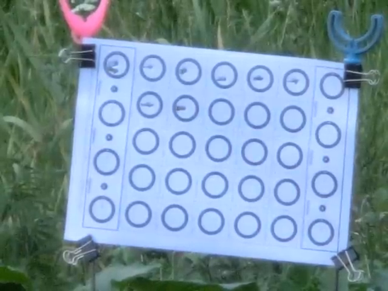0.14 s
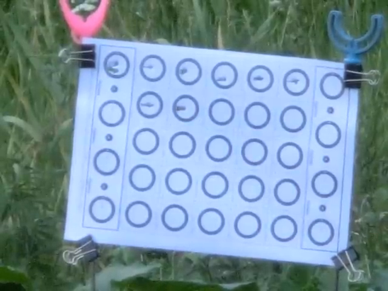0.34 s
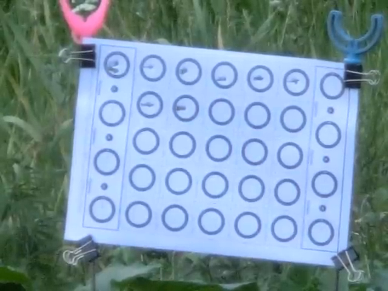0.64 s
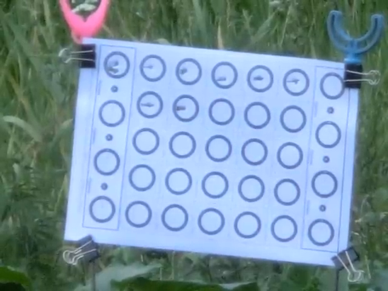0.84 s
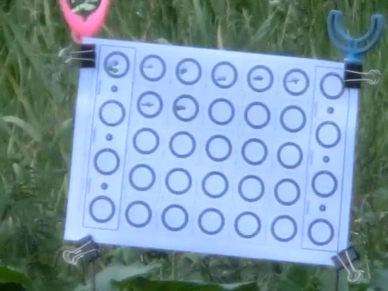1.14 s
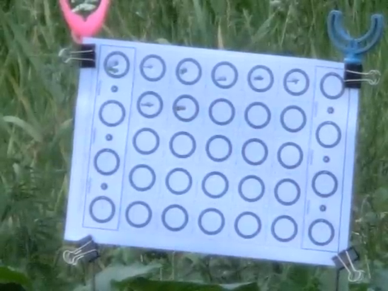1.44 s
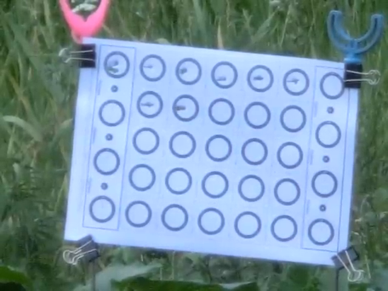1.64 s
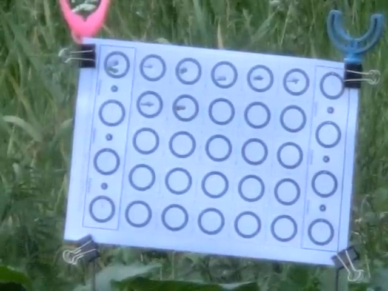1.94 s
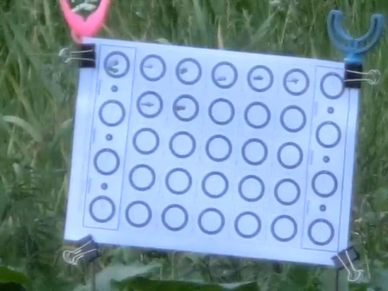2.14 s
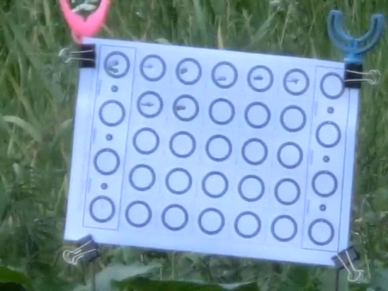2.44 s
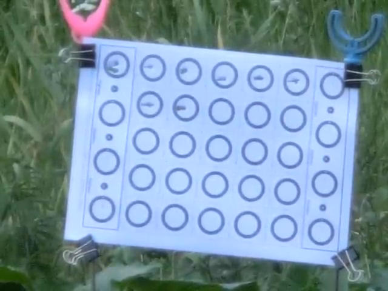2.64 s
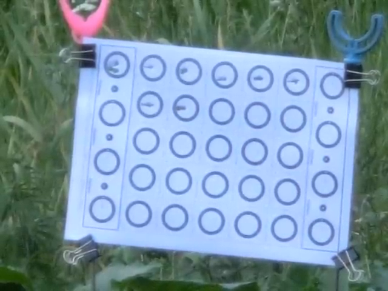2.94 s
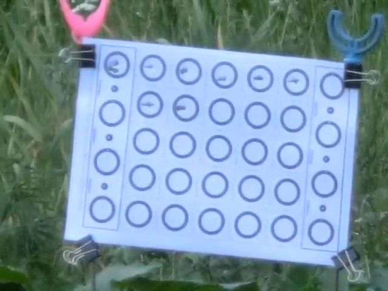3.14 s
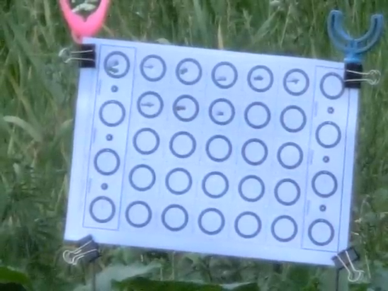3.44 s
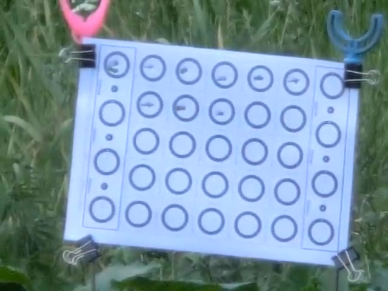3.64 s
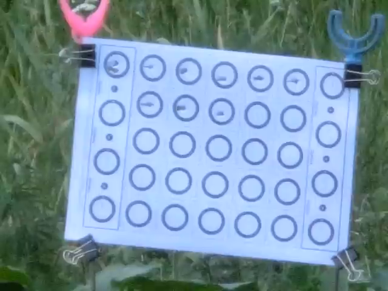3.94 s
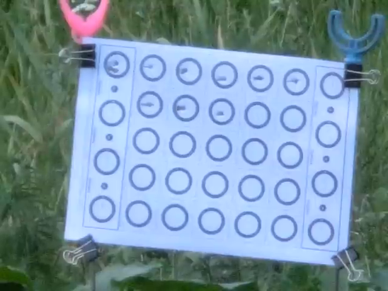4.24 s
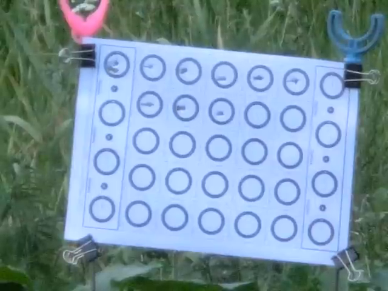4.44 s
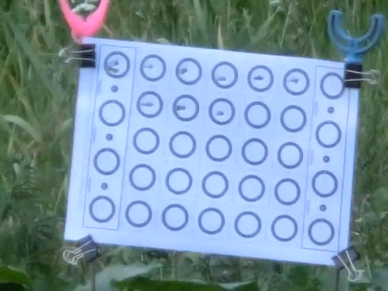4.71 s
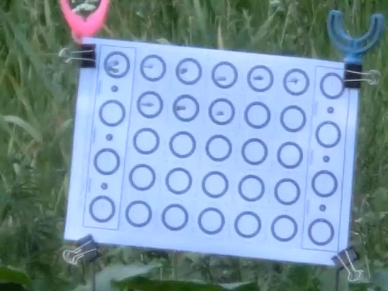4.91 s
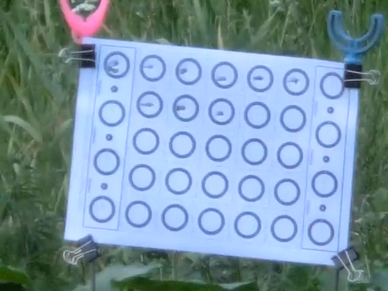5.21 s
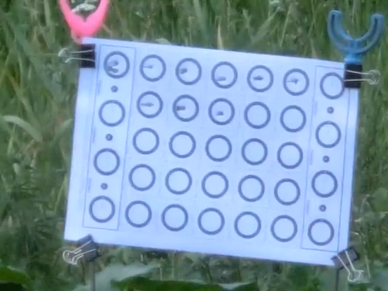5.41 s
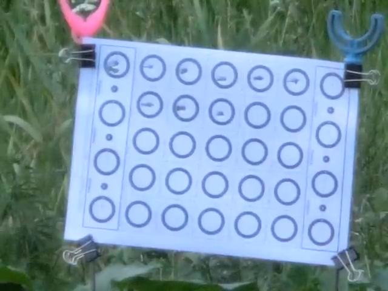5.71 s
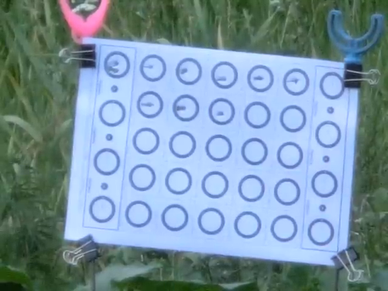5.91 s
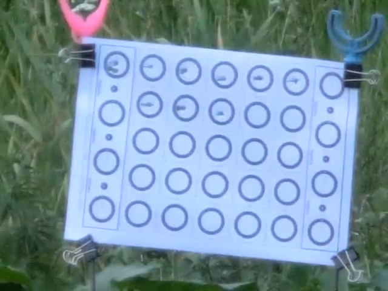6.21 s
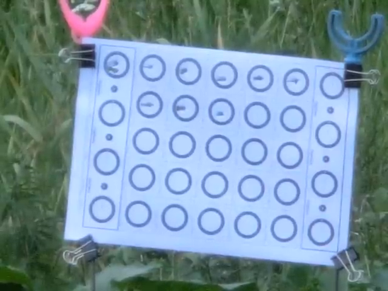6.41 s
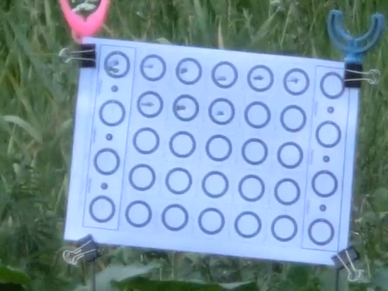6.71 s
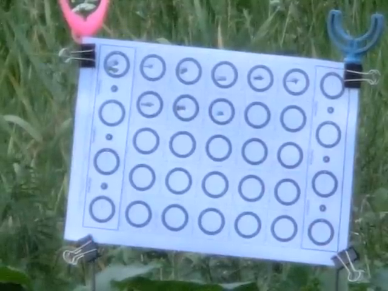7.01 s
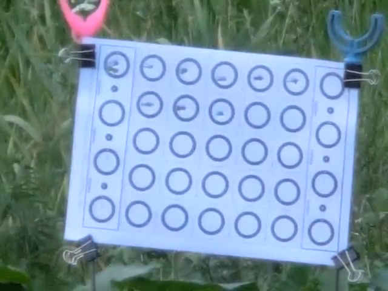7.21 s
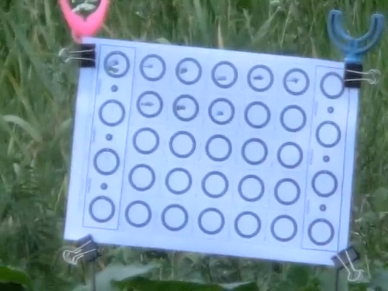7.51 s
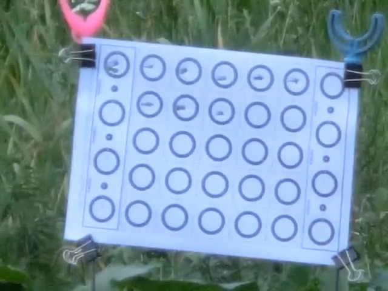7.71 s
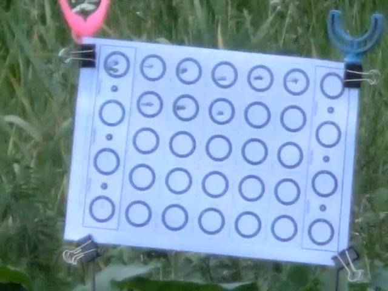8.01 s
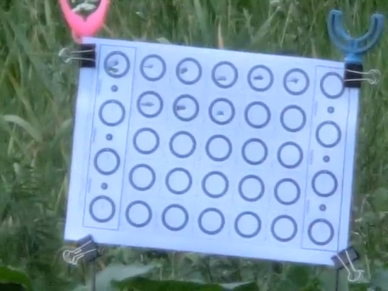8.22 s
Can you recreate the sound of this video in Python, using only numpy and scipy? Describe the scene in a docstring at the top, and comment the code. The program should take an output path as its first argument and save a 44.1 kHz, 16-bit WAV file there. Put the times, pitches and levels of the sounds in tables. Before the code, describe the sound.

A quiet field with passing traffic is split by a single air rifle shot hitting its target; the action clicks and rasps as background swells back.

```python
"""Air rifle shot in a grassy field

One shot cracks, the pellet smacks its target and trees throw the report back; then the action clicks and rasps.
Decaying resonances make the rifle, shaped noise its air jet, echo and clicks, and two short snaps the pellet.
Cars (filtered noise under a sliding comb), an engine drone, a gust, hiss and chirping birds lie behind.
The shot knocks the recorder's gain down, and the background slowly swells back."""
import sys
import numpy as np
from scipy import signal
from scipy.fft import rfft, irfft, next_fast_len
from scipy.io import wavfile
from scipy.ndimage import uniform_filter1d, minimum_filter1d

SR = 44100
rng = np.random.default_rng(int(sys.argv[2]) if len(sys.argv) > 2 else 0)


def materialize(psi):
    """Save the field psi as 16-bit PCM at rate SR to the path in sys.argv[1].

    A 1-D psi becomes a single channel; in a 2-D psi each row is a channel.
    """
    bounded = np.clip(np.atleast_2d(psi).T, -1, 1)
    quanta = np.round(bounded * 32767).astype(np.int16)
    wavfile.write(sys.argv[1], SR, quanta)


N = 368676  # length in samples


def amp(db):
    """Decibels to gain."""
    return 10 ** (np.asarray(db) / 20)


def evened(x):
    """Scales to rms 1."""
    return x / np.sqrt(np.mean(x ** 2) + 1e-30)


def read(points, hz):
    """Reads a curve on a log-frequency axis."""
    f, value = np.transpose(points)
    return np.interp(np.log(hz + 1), np.log(f), value)


def add(mix, s, sound):
    """Mixes a mono or stereo sound in at time s."""
    part = mix[:, round(s * SR):][:, :sound.shape[-1]]
    part += sound[..., :part.shape[1]]


def bump(t, centre, half):
    """A smooth hump of height 1 that falls to 1/e at half a length from its centre."""
    return np.exp(-((t - centre) / half) ** 2)


def swell(t, rise, t60):
    """An envelope that rises from t = 0 and dies away."""
    t = np.maximum(t, 0)
    return (1 - np.exp(-t / rise)) * amp(-60 * t / t60)


def smooth_random(size, width):
    """A smoothed random curve of rms 1."""
    return evened(uniform_filter1d(rng.standard_normal(size), size=width))


def noise(spectrum, likeness, size):
    """Stereo noise of rms 1 with a given colour and left-right likeness."""
    length = next_fast_len(size)
    hz = np.fft.rfftfreq(length, 1 / SR)
    a, b = rfft(rng.standard_normal((2, length)))
    same = np.clip(read(likeness, hz), -1, 1)
    pair = np.array([a, same * a + np.sqrt(1 - same ** 2) * b])
    return evened(irfft(pair * amp(read(spectrum, hz)), length)[:, :size])


# colour of the background haze: freq_hz, density_db (relative, per Hz)
HAZE_COLOUR = [(20, 23), (100, 16.5), (300, 12), (1000, 4.5), (3000, -3), (5000, 4), (6500, 4), (8000, 1),
               (12000, 1), (14500, 0), (15800, -8.5)]
# left-right likeness of the haze and the gust: freq_hz, coherence (0 to 1)
HAZE_LIKENESS = [(100, .1), (3000, .1), (7000, 0.06), (15000, 0.033)]


def hiss(level_db=-81.0):
    """A steady, wide haze of noise, nearly independent left and right."""
    return amp(level_db) * noise(HAZE_COLOUR, HAZE_LIKENESS, N)


# one soft gust at the microphones
GUST_S, GUST_HALF_S, GUST_DB = 4.7, 1, -65  # middle s, half length s, level dB


def gust():
    """A breeze buffets each microphone almost separately, mostly in the lows."""
    t = np.arange(N) / SR
    breeze = noise([(15, 0), (80, -6.0), (250, -21.0), (1500, -49)], HAZE_LIKENESS, N)
    return amp(GUST_DB) * bump(t, GUST_S, GUST_HALF_S) * breeze


# colour of the engine drone: freq_hz, density_db (relative, per Hz)
ENGINE_COLOUR = [(10, -7), (30, -5.5), (50, -6), (72, 1), (105, -5), (150, -12.5), (250, -18), (500, -33.5),
                 (2000, -71)]
# left-right likeness of direct sound: freq_hz, coherence (0 to 1)
DIRECT_LIKENESS = [(20, 0.99), (60, 0.97), (290, 0.93), (800, 0.99), (1500, 0.95), (3100, 0.65), (7000, .6),
                   (15000, .2)]
# the drone swells around the loudest car
DRONE_S, DRONE_HALF_S, DRONE_RISE_DB = 2, 1.2, 2.8  # middle s, half length s, rise dB


def engines(drone_db=-69.7):
    """Low drone of engines: deep noise with one broad swell."""
    t = np.arange(N) / SR
    level_db = drone_db + DRONE_RISE_DB * bump(t, DRONE_S, DRONE_HALF_S)
    return amp(level_db) * noise(ENGINE_COLOUR, DIRECT_LIKENESS, N)


# colour of the tyre roar: freq_hz, density_db (relative, per Hz)
TYRE_COLOUR = [(40, -19.5), (150, -7.5), (300, -3.5), (430, -12), (620, -3.5), (900, 0.5), (1300, -4.5),
               (1750, -9), (2400, -17), (3200, -22), (4500, -30.5), (8000, -38.5), (15000, -45)]
# cars on the road: nearest_s, level_db (there, relative), half_power_s, echo_share (0 to 1),
# pitch_hz (centre of the tilt), breadth_db (per octave either side of the pitch)
PASSING_CARS = [(.2, -78, .7, .3, 1198, 4), (2.5, -64.5, 1, .42, 1000, 0.75),
                (4.3, -74.5, .4, .35, 1000, -0.5), (5.92, -66, .38, .03, 1080, -4.4),
                (7.9, -69, 1.2, 0.071, 899.8, -4.5)]
# lag of the ground echo behind the direct roar: time_s, lag_ms
ECHO_LAG = [(0, 2.4), (1.6, 2.42), (3.1, 2.21), (5.2, 1.95)]


def road(roar_db=1, patchy_db=.9):
    """Each car's tyre roar grows and fades with distance; its echo off the ground lays a sliding comb on it."""
    hz, t, z = signal.stft(noise(TYRE_COLOUR, DIRECT_LIKENESS, N), SR, nperseg=1024, noverlap=768)
    lag_ms = np.interp(t, *np.transpose(ECHO_LAG))
    echo = np.exp(-2j * np.pi * hz[:, None] * lag_ms / 1000)
    band = np.clip(hz[:, None], 300, 8000)  # the tilt stops outside this range
    power = 0
    for s, db, half, share, pitch, breadth in PASSING_CARS:
        tilt_db = breadth * abs(np.log2(band / pitch))
        combed = amp(db + tilt_db) * (1 + share * echo)
        power = power + abs(combed) ** 2 / (1 + ((t - s) / half) ** 2)
    # smooth random patches in both pitch and time
    patches = uniform_filter1d(rng.standard_normal(z.shape), size=14, axis=0)
    patches = evened(uniform_filter1d(patches, size=14, axis=1))
    z = z * np.sqrt(power) * amp(roar_db + patchy_db * patches)
    return signal.istft(z, SR, nperseg=1024, noverlap=768)[1][:, :N]


# left-right likeness of scattered sound: freq_hz, coherence (0 to 1)
SCATTER_LIKENESS = [(60, 0.33), (1400, 0.97), (3100, .88), (6800, .6), (15000, .15)]


def scatter(x, rise, t60):
    """Grass and bushes return a sound as a short diffuse tail."""
    t = np.arange(SR // 2) / SR
    tail = noise([(1, 0), (SR, 0)], SCATTER_LIKENESS, len(t)) * swell(t, rise, t60)
    return signal.oaconvolve(x, tail / np.linalg.norm(tail[0]), axes=1)[:, :N]


def chirp(s, db, hz, length, fall, buzz, pulsing, pulse_hz=70):
    """One falling note; buzz roughens its pitch and pulsing chops it into syllables."""
    u = np.linspace(-.5, .5, round(length * SR))
    jitter = smooth_random(SR // 4, 36)[:len(u)]
    turns = np.cumsum(hz * (1 - fall * u + buzz * jitter)) / SR
    syllables = evened(1 + pulsing * np.cos(2 * np.pi * pulse_hz * length * u))
    note = np.cos(np.pi * u) * syllables * np.sin(2 * np.pi * turns)
    return s - length * 2 / 3, amp(db) * note * np.sqrt(2)  # s falls two thirds into the note


# bouts of evenly spaced chirps, or single ones: first_s, last_s, level_db (relative), pitch_hz
CHIRP_BOUTS = [(.22, 2.3, -86, 6250), (2.16, 3.06, -89.5, 5960), (3.1, 3.1, -83, 6100),
               (4.42, 5.7, -89, 6650), (5.88, 6.66, -89.5, 6326), (6.75, 7.28, -90, 6340),
               (8.17, 8.5, -85, 5700)]
# short falling whistles of another bird: time_s, level_db (relative), pitch_hz
FALLING_WHISTLES = [(6.87, -88, 3600), (6.93, -85.5, 3140)]
# a second bird's pulsed trills: middle_s, level_db (relative), pitch_hz
PULSED_TRILLS = [(3.09, -88.5, 5050), (6.53, -87.5, 5050)]
CHIRP_EVERY_S, BOUT_SWELL_DB = .26, 5  # rough pace within a bout, and how much louder its middle gets
CHIRP_SPREAD_DB, CHIRP_SPREAD_HZ = 1.2, 120  # most that one chirp strays from its bout's curve


def birds(trill_length=.16, trill_hz=29, direct_db=-6, wet_db=-3):
    """Bouts of buzzy chirps, falling whistles and pulsed trills: gliding sines blurred by scatter."""
    out = np.zeros((2, N))
    for first, last, db, hz in CHIRP_BOUTS:
        for u in np.linspace(0, 1, 1 + round(abs(last - first) / CHIRP_EVERY_S)):
            uneven = rng.uniform(-1, 1, 2)
            start = first + u * (last - first)
            level = db + BOUT_SWELL_DB * np.sin(np.pi * u) + CHIRP_SPREAD_DB * uneven[0]
            pitch = hz + CHIRP_SPREAD_HZ * uneven[1]
            add(out, *chirp(start, level, pitch, length=.075, fall=.05, buzz=.06, pulsing=.8))
    for row in FALLING_WHISTLES:
        add(out, *chirp(*row, length=.036, fall=.06, buzz=.012, pulsing=0))
    t = np.arange(round(trill_length * SR)) / SR
    for s, db, hz in PULSED_TRILLS:
        pulses = np.sin(np.pi * t / trill_length) * np.sin(np.pi * trill_hz * t) ** 4
        glide = 1 + .035 * np.sin(2 * np.pi * trill_hz * t)  # each pulse slides down
        turns = np.cumsum(hz * glide) / SR
        add(out, s - trill_length / 2, amp(db) * pulses * np.sin(2 * np.pi * turns) * np.sqrt(2))
    return amp(direct_db) * out + amp(wet_db) * scatter(out, rise=.002, t60=.12)


# colour of the echo from the trees: freq_hz, density_db (relative, per Hz)
TREE_COLOUR = [(200, -24), (1000, -27), (2800, -4), (4500, -1.5), (6500, 0), (9000, 1), (13000, 5),
               (15500, -0.5)]
# how long that echo lasts: freq_hz, t60_s
TREE_DECAY = [(1000, 1), (3000, 1), (6500, 0.74), (10000, 0.5), (15000, 0.26)]


def trees(start_s=3.36, echo_db=-49, rise=0.019, patchy_db=2):
    """The report comes back from a line of trees as an uneven rush that loses its treble first."""
    out = np.zeros((2, N))
    hz, t, z = signal.stft(noise(TREE_COLOUR, SCATTER_LIKENESS, SR), SR, nperseg=256)
    clumps = smooth_random(len(t), 4)
    fade = swell(t, rise, read(TREE_DECAY, hz)[:, None])
    z = z * fade * amp(echo_db + patchy_db * clumps)
    add(out, start_s, signal.istft(z, SR, nperseg=256)[1])
    return out


# clicks of cocking and loading: start_s, peak_db (before scatter), treble_db (treble share, sets the tilt)
LOADING_CLICKS = [(3.6234, -60, -17), (3.9154, -60, -27), (4.0332, -50, -17), (4.0976, -48, -13),
                  (4.3204, -53, -11), (4.3254, -51, -17), (4.4964, -55, -18), (4.7227, -50, -11),
                  (4.7346, -47, -13), (4.7844, -58, -13), (4.8499, -41, -18)]
# colour of the clicks and the slide: freq_hz, density_db (relative, per Hz)
LATCH_COLOUR = [(300, -32), (1200, -16), (2400, 1.5), (3300, -3), (4300, 0), (5200, -1), (6300, -1),
                (8500, -8.5), (12000, -5.5), (15500, -18.5)]


def loading(t60=.013, dry_db=0, wet_db=-8, brighten=0.46, wet_low_hz=4000):
    """Small metal parts scrape and snap home; the grass scatters mostly their treble."""
    t, out = np.arange(SR // 20) / SR, np.zeros((2, N))
    usual = np.mean([row[2] for row in LOADING_CLICKS])
    for s, db, treble in LOADING_CLICKS:
        tilt = brighten * (treble - usual)  # dB per octave around 5 kHz
        colour = [(hz, level + tilt * np.log2(hz / 5000)) for hz, level in LATCH_COLOUR]
        click = noise(colour, DIRECT_LIKENESS, len(t)) * swell(t, 0.0023, t60)
        add(out, s, amp(db) * click / abs(click).max())
    highpass = signal.butter(1, wet_low_hz, "high", fs=SR, output="sos")
    bright = signal.sosfilt(highpass, out)
    return amp(dry_db) * out + amp(wet_db) * scatter(bright, rise=.012, t60=0.16)


# the bolt slides back, then forward: middle_s, half_length_s, level_db
BOLT_SLIDES = [(4.3, .035, -80), (4.715, .03, -80)]


def sliding(catches_per_s=260):
    """The bolt rasps as it slides: a run of tiny catches of random strength."""
    t = np.arange(N) / SR
    catches = (rng.random(N) < catches_per_s / SR) * rng.exponential(1, N)
    tick = noise(LATCH_COLOUR, DIRECT_LIKENESS, SR // 100) * swell(t[:SR // 100], .0003, .005)
    rasp = evened(signal.oaconvolve(catches[None], tick, axes=1)[:, :N])
    return rasp * sum(amp(db) * bump(t, s, half) for s, half, db in BOLT_SLIDES)


# the pellet strikes target and backstop: start_s, peak_db (before scatter), snap_hz
PELLET_STRIKES = [(3.3229, -17, 7500), (3.3243, -25.5, 2400)]


def pellet(cycles=0.44, wet_db=-6):
    """Two very short snaps at the target, scattered by the plants around it."""
    t, out = np.arange(SR // 100) / SR, np.zeros((2, N))
    for s, db, hz in PELLET_STRIKES:
        ring = np.exp(-hz * t / cycles) * np.sin(2 * np.pi * hz * t)
        snap = np.diff(ring, prepend=0)
        add(out, s, amp(db) * snap / abs(snap).max())
    return out + amp(wet_db) * scatter(out, rise=0.00073, t60=0.17)


MUZZLE_S = 3.1641  # the air bursts from the muzzle
# colour of the air jet and its scatter off the ground nearby: freq_hz, density_db (relative, per Hz)
JET_COLOUR = [(40, -17.5), (150, -12), (400, -18), (1200, -14), (1900, -14.5), (2700, -6), (3600, -5),
              (5000, -4), (6100, 2), (7500, -1), (10000, -2.5), (12700, .5), (15500, -7)]
# left-right likeness of the air jet: freq_hz, coherence (0 to 1)
JET_LIKENESS = [(60, 0.51), (1400, 1), (2400, 0.96), (4500, 1), (7000, 1), (12000, 0.35)]


def muzzle(push_db=-14.5, push_hz=125, push_s=.002, burst_db=-4, jet_db=-8, jet_t60=0.07,
           ground_db=-36, ground_t60=.27, rough_db=1.63):
    """A pressure wave and a burst of air, then the sputtering jet and its scatter off the ground."""
    t, out = np.arange(SR // 2) / SR, np.zeros((2, N))
    push = amp(push_db) * np.cos(2 * np.pi * push_hz * t) * np.exp(-t / push_s)
    valve_open = (1 - np.tanh((t - .0036) / .0003)) / 2  # shuts after 3.6 ms
    sputter = amp(rough_db * smooth_random(len(t), 50))
    jet = amp(jet_db) * swell(t, .003, jet_t60)
    ground = amp(ground_db) * swell(t, 0.0076, ground_t60)
    air = amp(burst_db) * valve_open + sputter * (jet + ground)
    add(out, MUZZLE_S, push + air * noise(JET_COLOUR, JET_LIKENESS, len(t)))
    return out


# blows inside the rifle as it fires: start_s, peak_db
RIFLE_BLOWS = [(3.1615, -15), (3.1629, 2), (3.1641, 15)]
# broad resonances of action and barrel: freq_hz, width_hz, level_db (relative)
ACTION_MODES = [(610, 210, -6.5), (1100, 210, -14), (1310, 240, -2), (1640, 190, 0), (2730, 220, -2.5),
                (3260, 190, -3.5), (4020, 140, -7), (4390, 210, -3.5), (5050, 190, -8), (5340, 190, -9),
                (5830, 120, -0.5), (6900, 220, -5), (7400, 200, -6.5), (7810, 110, -7), (9650, 190, -8),
                (11660, 250, -12.5), (11730, 260, -8.5), (12100, 280, -6.5), (12350, 250, -8)]
# ringing of the steel parts: freq_hz, level_db (relative to ring_db), t60_s
STEEL_MODES = [(6040, 1, 0.097), (7070, -2.5, .075), (8920, -8, .07), (9300, -3, 0.09), (9948, -3, .05),
               (11020, -7.5, .07), (11785, -0.5, .08), (12280, -1, .08), (12600, -6, .07), (12800, -5, .08)]


def rifle(ring_db=-25, ring_width=0.59):
    """A few blows within milliseconds ring the action and, more faintly, the steel."""
    t, out = np.arange(SR // 4) / SR, np.zeros((2, N))
    knock = np.zeros(len(t))
    for hz, width, db in ACTION_MODES:
        knock += amp(db) * np.exp(-np.pi * width * t) * np.sin(2 * np.pi * hz * t)
    for s, db in RIFLE_BLOWS:
        add(out, s, amp(db) * knock / abs(knock).max())
    for hz, db, t60 in STEEL_MODES:
        # left and right start at different phases, which widens the ring
        phase = 2 * np.pi * rng.random() + ring_width * rng.standard_normal((2, 1))
        add(out, MUZZLE_S, amp(ring_db + db - 60 * t / t60) * np.sin(2 * np.pi * hz * t + phase))
    return out


def off_centre(x, lag_s=.000013):
    """A source slightly to the left reaches the right microphone a moment later."""
    size = next_fast_len(N)
    late = np.exp(-2j * np.pi * np.fft.rfftfreq(size, 1 / SR) * lag_s)
    return np.array([x[0], irfft(rfft(x[1], size) * late, size)[:N]])


def scene():
    """The shot and its aftermath over the background of the field."""
    background = road() + engines() + gust() + birds() + hiss()
    shooter = off_centre(rifle() + muzzle() + loading() + sliding())
    return shooter + trees() + pellet() + background


# the recorder's gain: at the start, the lowest it is pushed, and how fast it recovers
START_DB, LOWEST_DB, RECOVER_DB_PER_S = 8, -4, 3.2
EDGE_HZ = 15750  # upper band limit


def record(dry, target_db=-14, clip_db=1.5):
    """Gain control drops at a loud peak and creeps back; the report overloads; then the band limit."""
    peak = -minimum_filter1d(-abs(dry).max(0), size=200)
    allowed_db = np.maximum(target_db - 20 * np.log10(peak + 1e-9), LOWEST_DB)
    creep_db = RECOVER_DB_PER_S * np.arange(N) / SR
    # a running minimum under the creep: drops at once, climbs only at the recovery rate
    gain_db = np.minimum.accumulate(np.minimum(allowed_db - creep_db, START_DB)) + creep_db
    driven = dry * amp(uniform_filter1d(gain_db, size=60))
    clipped = np.clip(driven, -amp(clip_db), amp(clip_db))
    lowpass = signal.firwin(511, EDGE_HZ, window=("kaiser", 9), fs=SR)
    return signal.oaconvolve(clipped, lowpass[None], "same", axes=1)


dry = scene()
out = record(dry)
materialize(out)
```